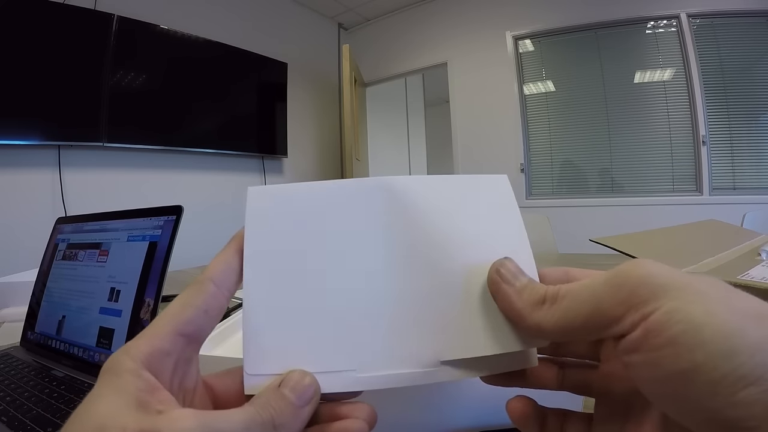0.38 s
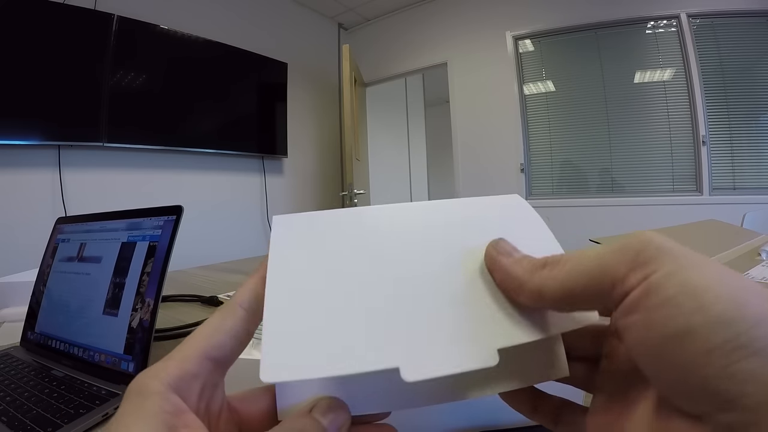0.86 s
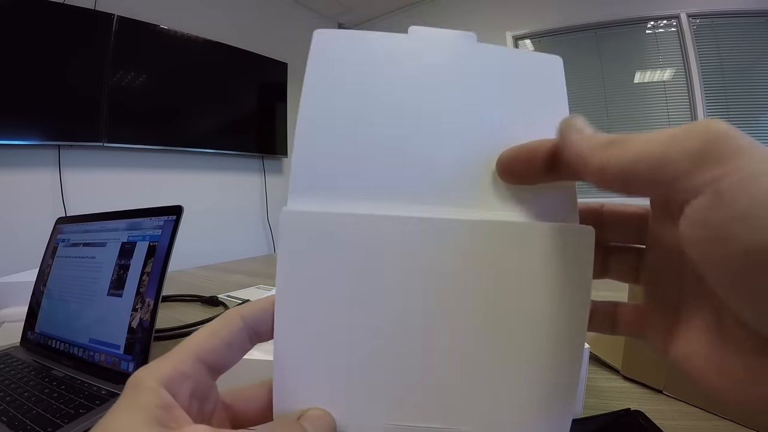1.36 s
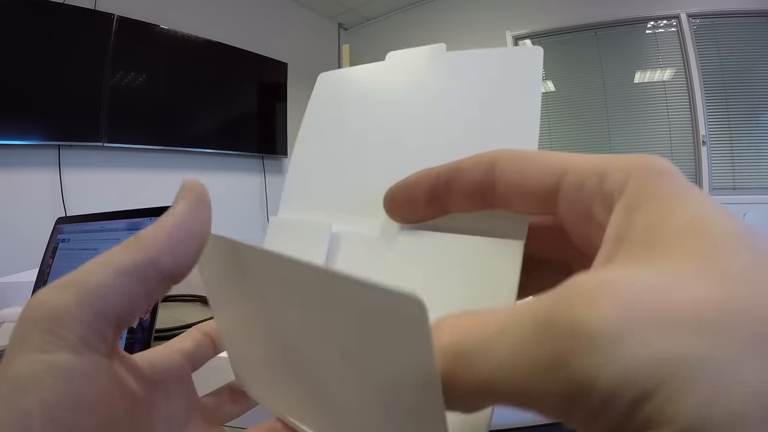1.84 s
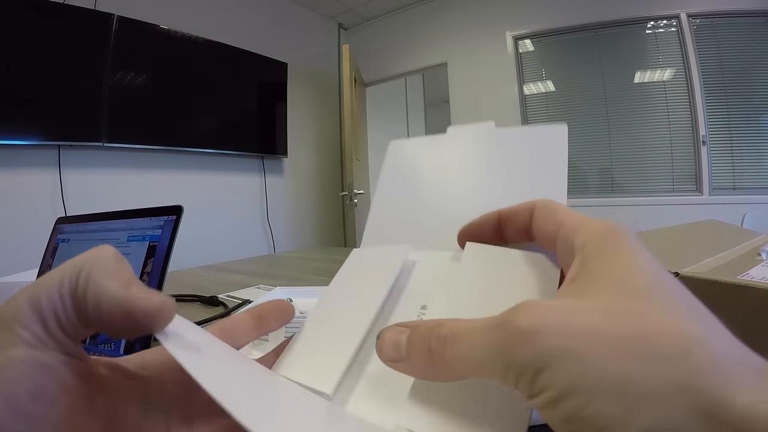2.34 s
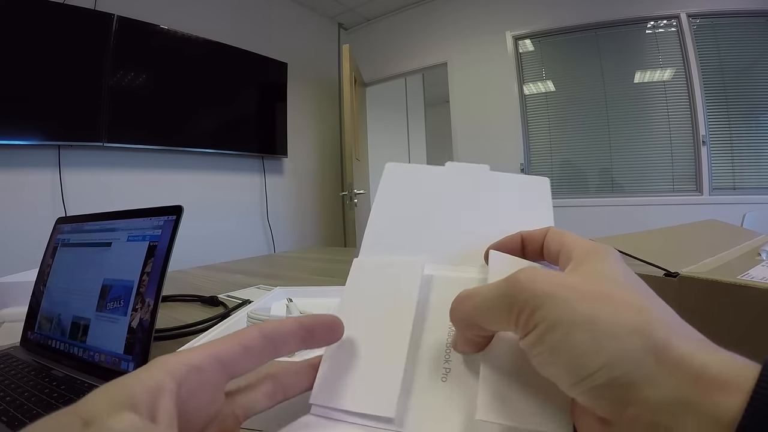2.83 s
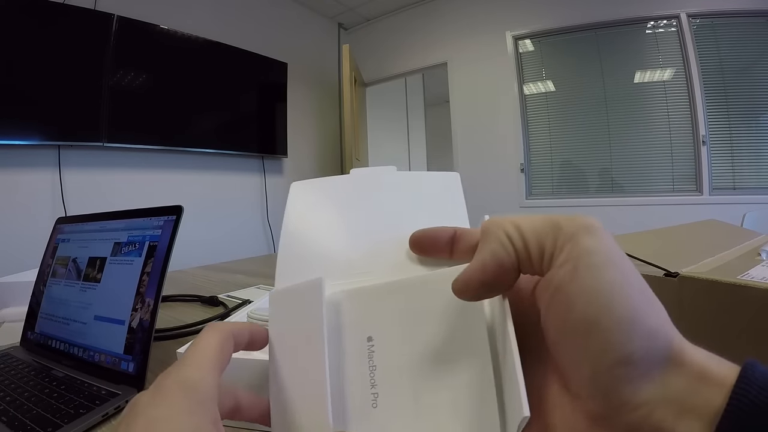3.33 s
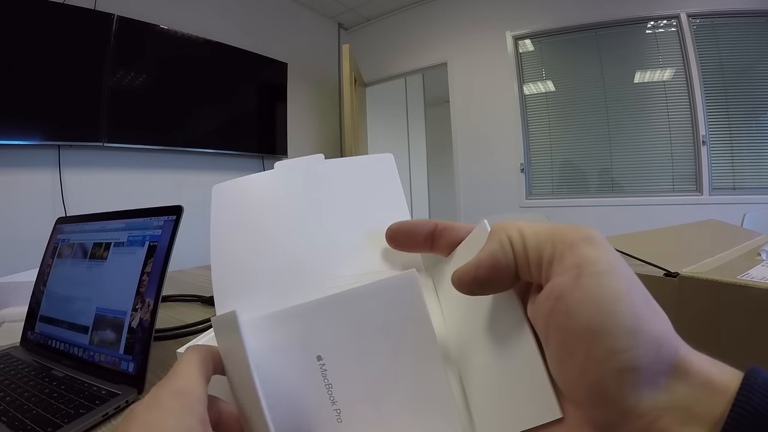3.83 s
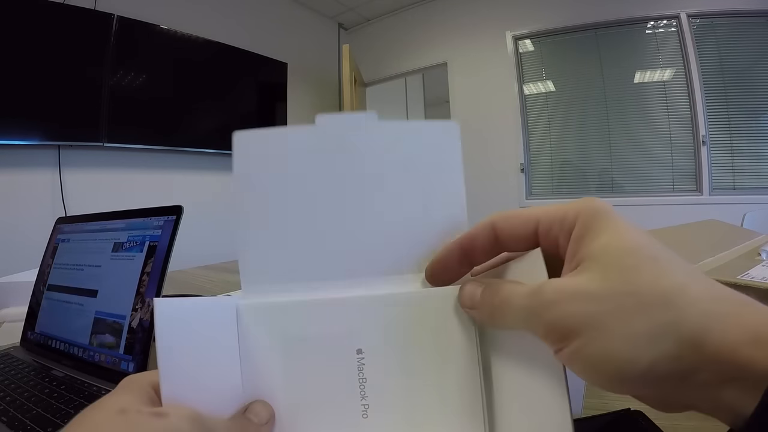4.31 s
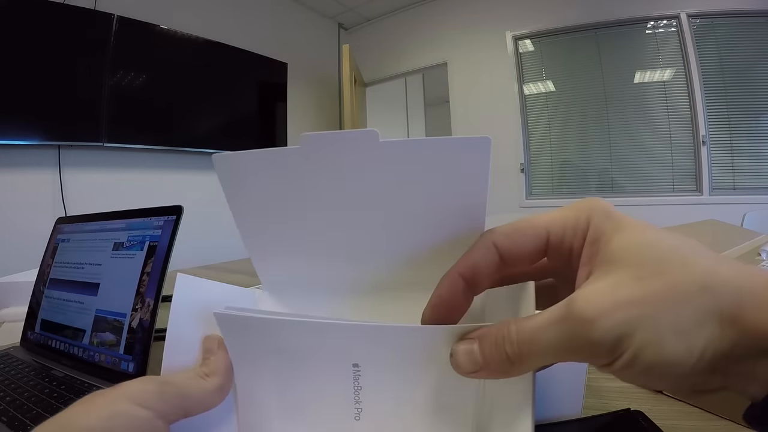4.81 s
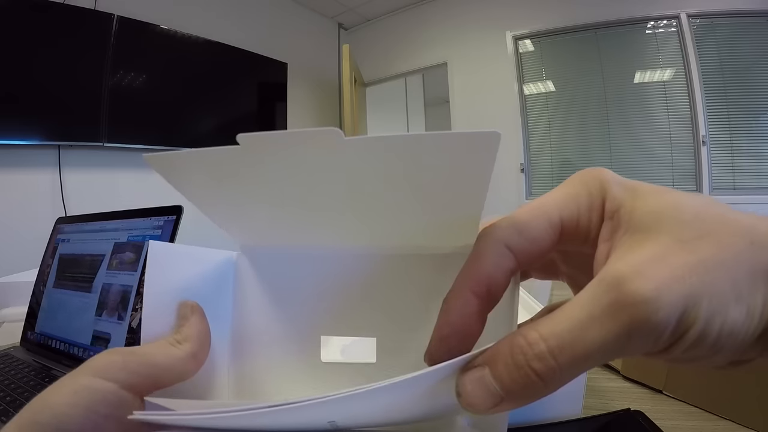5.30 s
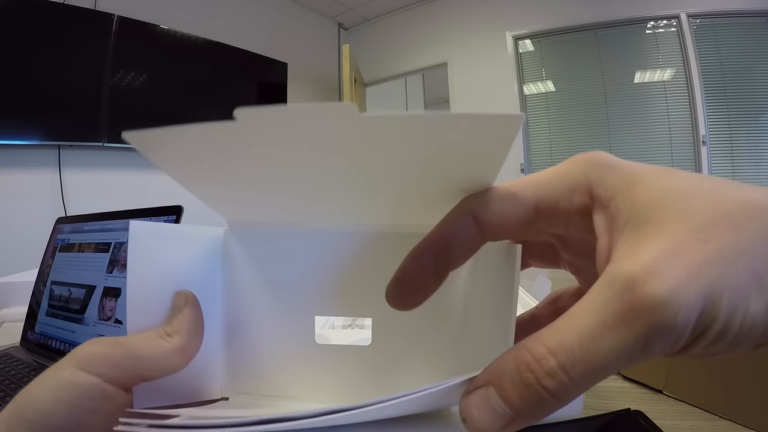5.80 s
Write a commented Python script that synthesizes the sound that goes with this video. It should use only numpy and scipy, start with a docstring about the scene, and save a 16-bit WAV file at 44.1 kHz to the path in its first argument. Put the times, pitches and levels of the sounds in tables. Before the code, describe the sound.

Close, dry handling of a thin card folder: small ticks, one very loud sharp pop, softer snaps and papery sliding over faint traffic.

```python
"""An office: hands open a thin card folder close to the microphone while a car passes behind the windows.
Tabs popping out of slots are struck modes with a dry crack; scraping edges are noise through card resonances.
Flaps thump as low struck modes; fingers slide on the smooth card as strokes of shaped friction noise.
The street is filtered noise with two sagging engine tones, and decaying noise gives the folder its echo."""
import sys
import numpy as np
from scipy import signal
from scipy.fft import rfft, irfft, next_fast_len
from scipy.io import wavfile
from scipy.ndimage import uniform_filter1d, map_coordinates

SR = 44100
rng = np.random.default_rng(int(sys.argv[2]) if len(sys.argv) > 2 else 0)


def boost_factor(decibels):
    """Convert a level in decibels to a linear amplitude factor."""
    exponent = np.asarray(decibels, float) / 20
    return 10 ** exponent


def output_pcm(signal):
    """Save a mono or channel-first signal as 16-bit PCM at the path in sys.argv[1].

    Samples are clipped to [-1, 1] before scaling.
    """
    pcm = np.clip(np.atleast_2d(signal).T, -1, 1) * 32767
    wavfile.write(sys.argv[1], SR, np.round(pcm).astype(np.int16))


N = 260959  # length in samples

# Microphone hiss spectrum. Each row: frequency in Hz, relative level in dB.
HISS_SPECTRUM = [(1180, -39), (2000, 10), (3100, -9), (4900, -6), (6520, -18), (13800, -14), (15700, -8)]
# Nearness of the traffic. Each row: time in seconds, tyre hiss level in dB.
STREET_LEVEL = [(0, -66), (.4, -67), (.7, -61), (2.2, -61.5), (2.6, -53.5), (2.85, -61), (3.1, -57),
                (4.4, -56.5), (5.05, -54.5), (5.35, -54.5), (5.92, -52)]
# Low traffic rumble spectrum. Each row: frequency in Hz, relative level in dB.
RUMBLE_SPECTRUM = [(12, -31), (20, 2), (40, -0.5), (54, -7.5), (87, -7), (229, -15), (312, -16), (500, -29),
                   (650, -41), (1100, -120)]
# Tyre hiss spectrum. Each row: frequency in Hz, relative level in dB.
TYRE_SPECTRUM = [(240, -38), (400, -13.5), (669, -5), (906, -3.5), (1100, -2), (1950, -16), (2850, -30),
                 (3000, -22), (3900, -58), (6600, -120)]
# Engine notes of the car. Each row: start in seconds, length in seconds, starting frequency in Hz, level in dB.
ENGINE_NOTES = [(3.955, 0.56, 277.5, -61.5), (4.38, 0.59, 217.8, -56.5)]
# Decay of the room. Each row: frequency in Hz, time to fall 60 dB in seconds.
OFFICE_DECAY = [(150, 0.43), (1500, 0.32), (5000, 0.18), (12000, 0.04)]
# Fingers and flaps sliding, short strokes over long holds. Each row: start in seconds, length in seconds,
# level at the stroke's end in dB, treble sheen relative to that level in dB, panel tone centre in Hz.
SLIDE_STROKES = [(0, 0.014, -51, -2.5, 3730), (0.111, 0.02, -49, -3, 3360), (.14, 0.054, -67, 2.5, 3100),
                 (0.216, 0.058, -58, -11, 2860), (0.337, 0.099, -60.5, -20, 2440),
                 (.458, 0.11, -50, -2, 2300), (0.58, 0.17, -63, -19, 2200),
                 (0.658, 0.0083, -40.5, -24, 2080), (0.818, 0.062, -48.5, -9, 2100),
                 (0.88, 0.17, -56, -14, 2070), (0.953, .04, -62, 8, 2400), (0.998, 0.041, -51.5, 3.5, 2640),
                 (1.045, 0.14, -55.5, -2, 3000), (1.197, .46, -60, -8, 2560),
                 (1.395, 0.15, -61.5, -1, 2600), (1.528, 0.059, -55, -1, 2700),
                 (1.623, 0.039, -57, -4.5, 2700), (1.695, 0.25, -55.5, 0, 3340),
                 (1.757, 0.083, -54, 3, 3100), (1.958, 0.53, -60, -11, 3000), (1.998, 0.083, -56, -9, 3000),
                 (2.201, 0.09, -52.5, -9, 2700), (2.319, 0.037, -59, -4, 2700),
                 (2.452, 0.86, -57.5, -3.5, 2960), (2.505, 0.035, -49.5, -10.5, 2700),
                 (2.718, 0.042, -62.5, 7.5, 2840), (2.802, 0.087, -58.5, 4, 2900),
                 (3.015, .24, -55, -4, 3600), (3.323, 0.062, -53, -23, 3780),
                 (3.39, 1.1, -60.5, -4.5, 4160), (3.513, 0.023, -54.5, -4, 4300),
                 (3.59, 0.21, -53, -15, 4400), (3.697, .105, -64.5, 4, 4400), (3.904, .1, -53, -6, 3270),
                 (4.023, 0.016, -47, -11, 3350), (3.943, 0.031, -47, -3.5, 3000),
                 (4.038, 0.23, -64, 5.5, 4400), (4.283, 0.15, -57, -7.5, 3420),
                 (4.439, 0.026, -57, 7, 3450), (4.517, .3, -54, -3.5, 3930), (4.542, 0.022, -54.5, 3, 3500),
                 (4.887, 0.3, -59, -10, 3000), (4.939, 0.014, -44, -6, 2790), (4.958, .14, -52, -3, 3100),
                 (4.998, 0.019, -47.5, -7, 3100), (5.037, 0.038, -53.5, 4, 3330),
                 (5.099, 0.018, -48, 6, 3850), (5.145, 0.012, -51.5, 2, 4070),
                 (5.194, 0.018, -48, -12, 4400), (5.395, .13, -75.5, -3, 3450),
                 (5.667, 0.31, -63, -8, 2460), (5.664, 0.051, -59, -2.5, 2340),
                 (5.762, 0.043, -50.5, -18, 2800), (5.858, .06, -55, -7, 4160),
                 (5.892, .03, -47.5, -18, 4400)]
# Broad body of the friction noise. Each row: frequency in Hz, relative level in dB.
SKIN_SPECTRUM = [(710, -33), (1200, 1.5), (1370, -5.5), (1800, -2), (2080, -4.5), (2260, -5), (2580, -1.5),
                 (4510, -1.5), (9000, -18), (11700, -37), (19800, -120)]
# Treble sheen of the friction noise. Each row: frequency in Hz, relative level in dB.
SHEEN_SPECTRUM = [(3530, -5), (6000, -4.5), (6910, -5.5), (10200, -7.5), (13100, -8), (14800, -14),
                  (15700, -18)]
# A flap pushed or let go. Each row: start in seconds, peak level in dB, pitch in Hz.
FLAP_THUMPS = [(.139, -43, 48), (0.218, -45, 255), (0.221, -36.5, 69), (0.418, -39.5, 60),
               (0.656, -30, 402), (0.662, -23, 109), (0.814, -27, 340), (0.819, -16, 171),
               (0.831, -23.5, 370), (0.831, -22, 35.4), (.949, -37, 40.5), (1.145, -22, 298),
               (1.153, -20.5, 223), (1.16, -23, 86), (1.193, -33, 35.6), (1.328, -37.5, 200),
               (1.709, -46, 99), (1.73, -35.5, 128), (2.123, -38, 63.5), (2.7, -41, 57.6),
               (2.913, -28, 445), (2.937, -30, 60), (3.119, -35, 80.5), (4.294, -32.5, 120),
               (4.316, -20.5, 74), (4.327, -39, 450), (4.33, -29.5, 75), (4.455, -39, 120),
               (4.551, -36.5, 45), (5.177, -44, 91)]
# Modes of the whole flap flexing. Each row: frequency in Hz, relative level in dB, time to fall 60 dB in seconds.
FLAP_MODES = [(31.4, -17, 0.36), (48, -7.5, 0.088), (75, -6, .1), (120, 1.5, 0.045), (174, 3.5, 0.046),
              (245.4, 4, 0.06), (334.5, -1.5, 0.092), (477, 1.5, 0.055), (616, 18, 0.018)]
# Modes of the card's small panels. Each row: frequency in Hz, relative level in dB,
# share of the contact's 60 dB decay time (a ratio).
PANEL_MODES = [(498, 7, 2.4), (686, -1, 2.6), (760, 3.5, 1.6), (923, -0.5, 0.98), (1080, 3.5, 0.96),
               (1250, 5, 0.61), (1490, 1, 0.83), (1750, 5.5, 0.69), (1980, 5.5, 0.46), (2300, 8, 0.7),
               (2700, 8.5, 0.54), (3100, 2.5, 1.06), (3600, 6.5, 0.83), (4400, 8, 1.3), (5300, 9, 0.47),
               (6500, 6, 0.81)]
# An edge dragged through its slot until it lets go. Each row: start in seconds, length in seconds,
# level at release in dB, resonance centre in Hz.
SLOT_SCRAPES = [(0.754, 0.038, -45.5, 1780), (.798, 0.02, -34.5, 2070), (1.061, 0.042, -45.5, 1570),
                (1.1, 0.042, -27, 1180), (1.134, 0.012, -23.5, 2500), (2.878, 0.034, -42.5, 990),
                (2.898, 0.011, -32.5, 1500), (2.911, 0.021, -27, 875)]
# Contacts of card on card. Each row: start in seconds, peak level of the ring in dB, pitch in Hz,
# peak of the crack relative to the ring in dB.
CARD_SNAPS = [(.11, -36, 2340, 2.5), (.224, -34.5, 2930, 0), (.343, -44, 2460, 3), (.458, -28, 2010, -17),
              (.647, -36, 4030, 4), (.659, -26, 1800, 1.5), (.665, -29, 1840, 5), (.812, -11, 1780, -10),
              (.819, 4.5, 1770, 2), (.954, -38, 1640, -11), (1.077, -27, 1490, -15),
              (1.148, -14.5, 1280, -26), (1.278, -41.5, 2320, -12), (1.311, -40, 1980, -10),
              (1.341, -38, 2580, 0), (1.697, -37, 1980, -15), (1.71, -44, 686, 12), (1.727, -35, 1750, -3),
              (1.813, -34.5, 1770, -13), (2.002, -31, 1610, 5), (2.13, -33.5, 1080, 4.5),
              (2.245, -40.5, 750, -7), (2.259, -38.5, 814, -15), (2.263, -34.5, 1750, -2),
              (2.287, -42, 910, -8), (2.472, -37, 2330, -4), (2.55, -43, 3600, -12),
              (2.567, -36.5, 1750, -12), (2.901, -36, 1250, -2), (2.908, -16.5, 1250, -4),
              (2.913, -16, 760, -30), (2.935, -23.5, 990, 4.5), (3.01, -50, 4500, -7), (3.12, -41, 860, 4),
              (3.521, -41, 3870, -1), (3.771, -42, 4840, -17), (3.79, -43.5, 706, -21),
              (3.95, -36.5, 2700, 5), (4.033, -37.5, 1070, -7), (4.291, -27, 1040, 0.5),
              (4.326, -31.5, 1000, 5), (4.403, -37, 1080, 5), (4.455, -40.5, 1900, -6),
              (4.486, -47, 5300, -4), (4.525, -43, 3400, 6), (4.552, -40, 3460, -9),
              (4.594, -31, 5300, -15), (4.685, -46, 6500, 15), (4.784, -55, 1060, -6),
              (4.928, -35.5, 2700, -12), (5.11, -34.5, 3300, 6.5), (5.118, -34, 3300, 1),
              (5.175, -39, 1080, 1), (5.471, -43.5, 1050, 8.5), (5.491, -51, 5300, 13),
              (5.666, -40.5, 900, 4), (5.766, -40, 1270, -14)]

CONTROL_STEP = 64  # samples between stroke power values
# rumble: level over the mean tyre hiss, share of the hiss's swings in dB, its own surges
RUMBLE_DB, RUMBLE_FOLLOWS, RUMBLE_SURGE_DB = 9.5, 0.48, 0.83
SAG_HZ_PER_S = 7.3  # fall of the engine notes
REST_DB, REST_SHEEN_DB, REST_HZ = -69, -1, 3000  # hands just holding the card
# strokes and drags: swell from start to end, onset, time to fall 20 dB after the end
STROKE_SWELL_DB, STROKE_RISE_S, STROKE_STOP_S = 2, 0.0096, 0.015
DRAG_SWELL_DB, DRAG_RISE_S, DRAG_STOP_S = 7, 0.004, 0.005
# broad rasp beside the panel tone: level at a 1 kHz centre, gain as the centre rises, sheen within the rasp
RASP_DB, RASP_DB_PER_OCTAVE, RASP_SHEEN_DB = -11, 9, -14.5
# 60 dB decay time of a contact at the stated pitch, before each panel's share; lower ones ring longer by the power
RING_S, RING_HZ, RING_LAW = 0.025, 1750, 0.49
# drive lost per octave from the pitch for a -21 dB contact; growth per dB, as harder ones favour one panel
FOCUS_DB_PER_OCTAVE, FOCUS_GROWS = 17.5, 0.12


def unit(x):
    """Normalisation: the signal is scaled to rms 1."""
    return x / np.sqrt(np.mean(x ** 2) + 1e-20)


def along(points, hz):
    """Logarithmic frequency axis: (Hz, value) points are interpolated upon it."""
    point_hz, value = np.transpose(points)
    return np.interp(np.log(hz + 1), np.log(point_hz + 1), value)


def curves(rows):
    """Linear interpolation: each column after the time becomes one value per sample."""
    s, *columns = np.transpose(rows)
    return [np.interp(np.arange(N) / SR, s, column) for column in columns]


def full(control):
    """Linear interpolation: a control given every CONTROL_STEP samples becomes one value per sample."""
    return np.interp(np.arange(N), CONTROL_STEP * np.arange(len(control)), control)


def wobble(rate):
    """Random modulation: a smooth curve through normal random knots, rate of them a second."""
    return map_coordinates(rng.standard_normal(N // 8), [np.arange(N) * rate / SR])


def filtered(x, response):
    """Linear filtering: the spectrum is multiplied by a response of frequency, then scaled to rms 1."""
    size = next_fast_len(N + 4096)
    spectrum = rfft(x, size) * response(np.fft.rfftfreq(size, 1 / SR))
    return unit(irfft(spectrum, size)[:N])


def rush(spectrum, patchy_db, grain_db=0):
    """Coloured noise: random gain over patches of time and frequency, a grainy envelope, rms 1."""
    grains = rng.standard_normal(N) * boost_factor(grain_db * wobble(900))
    _, _, z = signal.stft(grains, SR, nperseg=512)
    patches = uniform_filter1d(rng.standard_normal(z.shape), size=8, axis=0)
    patches = unit(uniform_filter1d(patches, size=8, axis=1))
    patchy = signal.istft(z * boost_factor(patchy_db * patches), nperseg=512)[1][:N]
    return filtered(patchy, lambda f: boost_factor(along(spectrum, f)))


def struck(t, hz, db, t60, pitch_hz, slope_db, luck):
    """Modal synthesis: modes near the pitch are driven most; the card's bend retunes them per blow. Peak 1."""
    octaves_away = np.abs(np.log2(hz / pitch_hz))
    drive = boost_factor(db - slope_db * octaves_away + 2 * luck[0])
    swing = np.sin(2 * np.pi * hz * (1 + 0.031 * luck[1]) * t + 0.9 * luck[2])
    rise = 1 - np.exp(-t * pitch_hz * 3)  # the contact lasts a part of a cycle
    ring = rise * (drive * boost_factor(-60 * t / t60) * swing).sum(axis=0)
    return ring / np.abs(ring).max()


def shaken(centre_hz, slope_db, width, grain_db):
    """Forced resonance: dense slips shake the card's panels, most those near a moving centre; rms 1."""
    slips = rng.standard_normal(N) * boost_factor(grain_db * wobble(600))
    out, power = np.zeros(N), np.zeros(N)
    for hz, db, _ in PANEL_MODES:
        weight = boost_factor(db - slope_db * np.abs(np.log2(hz / centre_hz)))
        # two equal resonators in series; width is a fraction of the mode's frequency
        out += weight * filtered(slips, lambda f: (1j * f * hz / (hz * hz - f * f + 1j * f * width * hz)) ** 2)
        power += weight ** 2
    return unit(out / np.sqrt(power))


def strokes(rows, swell_db, rise_s, stop_s):
    """Friction envelope: power of each (start, length, dB) row; quick onset, swell to its end, then decay."""
    start, length, db = np.transpose(rows)[:3, :, None]
    t = np.arange(0, N + CONTROL_STEP, CONTROL_STEP) / SR - start
    swell = swell_db * (np.minimum(t / length, 1) - 1)
    fall = 20 * np.clip(t - length, 0, None) / stop_s
    onset = np.clip(t / rise_s + 0.5, 0, 1)
    return onset ** 2 * boost_factor(2 * (db + swell - fall))


def microphone_hiss():
    """Self-noise: a steady coloured noise of the microphone."""
    return boost_factor(-69.5) * rush(HISS_SPECTRUM, patchy_db=3.0)


def street():
    """Transmission through glass: low rumble, tyre hiss near 1 kHz and two brief, sagging engine notes."""
    tyre_db, = curves(STREET_LEVEL)
    mean_db = tyre_db.mean()
    rumble_db = mean_db + RUMBLE_DB + RUMBLE_FOLLOWS * (tyre_db - mean_db)
    out = boost_factor(rumble_db + RUMBLE_SURGE_DB * wobble(4.17)) * rush(RUMBLE_SPECTRUM, patchy_db=-0.73)
    out += boost_factor(tyre_db + wobble(4.96)) * rush(TYRE_SPECTRUM, patchy_db=1.0)
    for s, length, hz, db in ENGINE_NOTES:
        t = np.arange(round(length * SR)) / SR
        level = np.sqrt(2) * boost_factor(db + 1.8 * wobble(9.5)[:len(t)])
        note = level * np.sin(2 * np.pi * (hz - SAG_HZ_PER_S * t / 2) * t)
        out[round(s * SR):][:len(t)] += signal.windows.tukey(len(t), 0.3) * note
    return out


def office(x):
    """Reverberation: convolution with noise in which each frequency dies at its own speed."""
    hz, t, z = signal.stft(rng.standard_normal(SR // 2), SR, nperseg=256)
    decay = boost_factor(-60 * t / along(OFFICE_DECAY, hz)[:, None])
    tail = signal.istft(z * decay, SR, nperseg=256)[1]
    delayed = np.pad(x, (200, 0))  # samples
    return signal.fftconvolve(delayed, tail / np.linalg.norm(tail))[:N]


def sliding():
    """Sliding friction: skin and card rub in strokes; body, panel tone and treble sheen share the grip."""
    power = strokes(SLIDE_STROKES, STROKE_SWELL_DB, STROKE_RISE_S, STROKE_STOP_S)
    sheen_db, hz = np.transpose(SLIDE_STROKES)[3:]
    rest = boost_factor(2 * REST_DB)
    total = power.sum(axis=0) + rest
    sheen = np.sqrt(boost_factor(2 * sheen_db) @ power + rest * boost_factor(2 * REST_SHEEN_DB))
    grip = boost_factor(0.83 * wobble(40) + 0.41 * wobble(120))
    centre_hz = full((hz @ power + REST_HZ * rest) / total)
    panel = shaken(centre_hz, slope_db=16.5, width=0.14, grain_db=2)
    # fibres catch now and then, 60 a second on average
    grit = (rng.random(N) < 60 / SR) * rng.exponential(1, N) * rng.choice([-1, 1], N)
    panel += boost_factor(-5) * filtered(grit, lambda f: (1j * f * 2800 / (2800 ** 2 - f * f + 1j * f * 3500)) ** 2)
    body = full(np.sqrt(total)) * (rush(SKIN_SPECTRUM, patchy_db=2.5, grain_db=0.5) + boost_factor(-5.5) * panel)
    treble = full(sheen) * boost_factor(1.5 * wobble(25)) * rush(SHEEN_SPECTRUM, patchy_db=2.6, grain_db=0.5)
    return grip * (body + treble)


def thumps():
    """Flexural vibration: the bending flaps push the air in low, short-lived modes."""
    out, t = np.zeros(N + SR), np.arange(SR // 4) / SR
    hz, flap_db, t60 = np.transpose(FLAP_MODES)[:, :, None]
    scatter = rng.standard_normal((len(FLAP_THUMPS), 3, len(FLAP_MODES), 1))
    for (s, db, pitch_hz), luck in zip(FLAP_THUMPS, scatter):
        push = struck(t, hz, flap_db, t60, pitch_hz, 10.7, luck)
        out[round(s * SR):][:len(t)] += boost_factor(db) * push
    return out[:N]


def scrapes():
    """Friction-driven resonance: an edge rasps through its slot, louder as it nears release."""
    power = strokes(SLOT_SCRAPES, DRAG_SWELL_DB, DRAG_RISE_S, DRAG_STOP_S) + 1e-14
    hz = np.transpose(SLOT_SCRAPES)[3]
    total = power.sum(axis=0)
    centre_hz = full(hz @ power / total)
    rasp = rush(SKIN_SPECTRUM, patchy_db=-7.5, grain_db=3.0)
    rasp += boost_factor(RASP_SHEEN_DB) * rush(SHEEN_SPECTRUM, patchy_db=5.0, grain_db=-2.0)
    rasp *= boost_factor(RASP_DB + RASP_DB_PER_OCTAVE * np.log2(centre_hz / 1000))
    return full(np.sqrt(total)) * (shaken(centre_hz, slope_db=15, width=0.17, grain_db=2.0) + rasp)


def snaps():
    """Impact excitation: each contact rings the card's panels and gives a short dry crack."""
    out, t = np.zeros(N + SR), np.arange(SR // 8) / SR
    hz, card_db, share = np.transpose(PANEL_MODES)[:, :, None]
    scatter = rng.standard_normal((len(CARD_SNAPS), 3, len(PANEL_MODES), 1))
    edge = signal.butter(1, [1000, 4500], "bandpass", fs=SR)
    bursts = rng.standard_normal((len(CARD_SNAPS), len(t))) + 6 * (t == 0)  # noise led by a click
    cracks = signal.lfilter(*edge, bursts * boost_factor(-60 * t / 0.0066))
    for (s, db, pitch_hz, crack_db), luck, crack in zip(CARD_SNAPS, scatter, cracks):
        t60 = RING_S * (RING_HZ / pitch_hz) ** RING_LAW * share
        focus = FOCUS_DB_PER_OCTAVE + FOCUS_GROWS * (db + 21)
        ring = struck(t, hz, card_db, t60, pitch_hz, focus, luck)
        crack = boost_factor(crack_db) * crack / np.abs(crack).max()
        out[round(s * SR):][:len(t)] += boost_factor(db) * (ring + crack)
    return out[:N]


def scene():
    """Superposition: street, sliding, thumps and folder add; only snaps and scrapes excite the room."""
    folder = snaps() + scrapes()
    echo = boost_factor(-22.5) * office(folder)
    mix = street() + sliding() + thumps() + echo + folder
    return mix[None]


def low_pass(x):
    """Removes everything above the highest recorded frequency."""
    return signal.sosfilt(signal.butter(12, 16620, fs=SR, output="sos"), x)


def record(dry):
    """Superposition and saturation: microphone hiss is added and the loudest pop overloads softly."""
    x = dry + microphone_hiss()
    # a steep low-pass: the highest treble is missing
    x = signal.sosfilt(signal.ellip(6, 0.5, 24, 15500, fs=SR, output="sos"), x)
    x = x / (1 + np.abs(x / 0.88) ** 4) ** (1 / 4)  # levels off towards 0.88
    return low_pass(x)


dry = scene()
out = record(dry)
output_pcm(out)
```